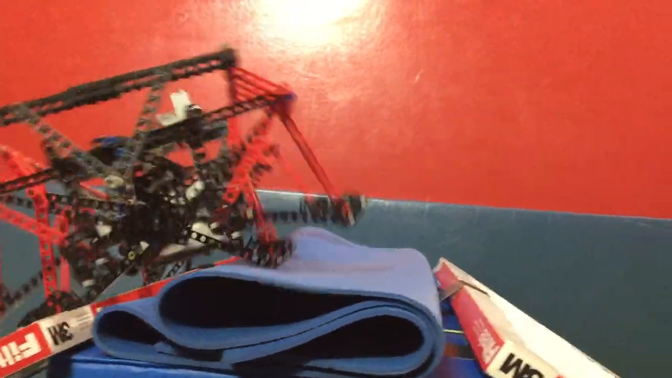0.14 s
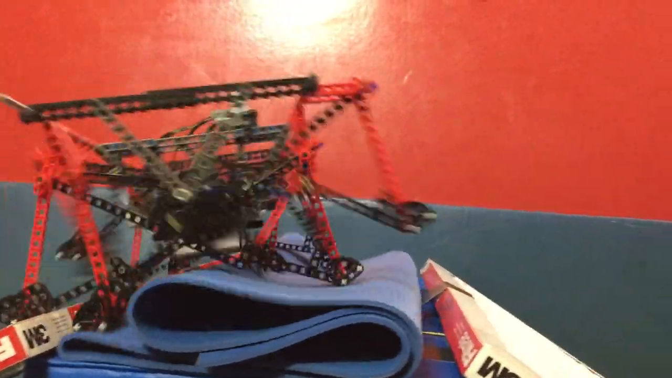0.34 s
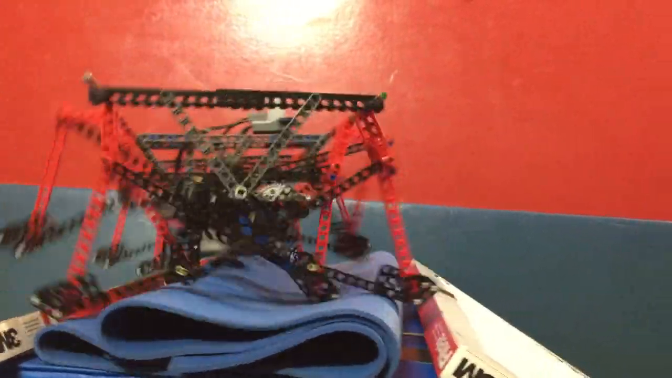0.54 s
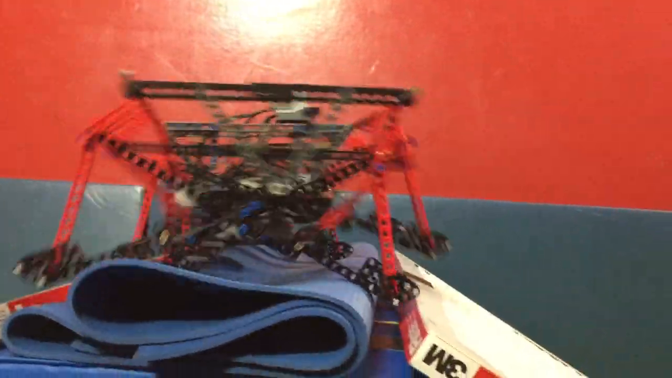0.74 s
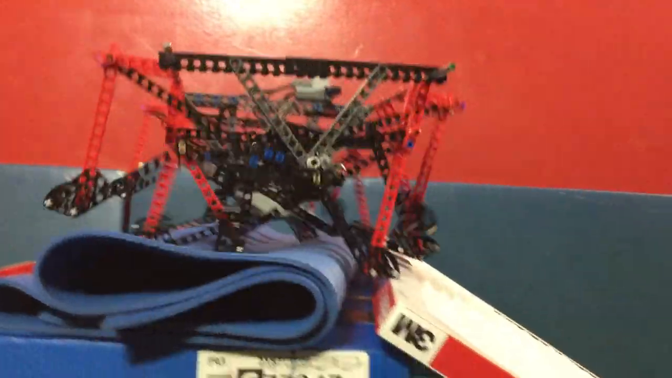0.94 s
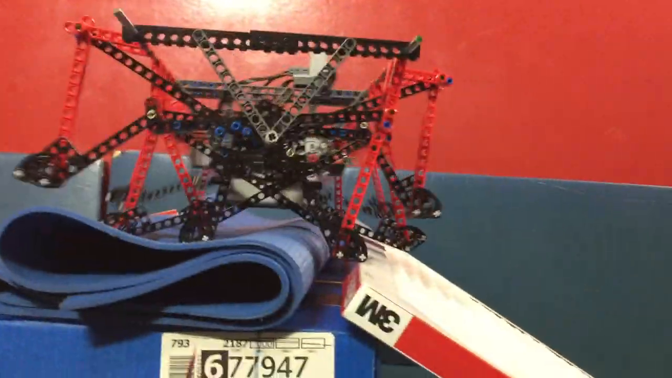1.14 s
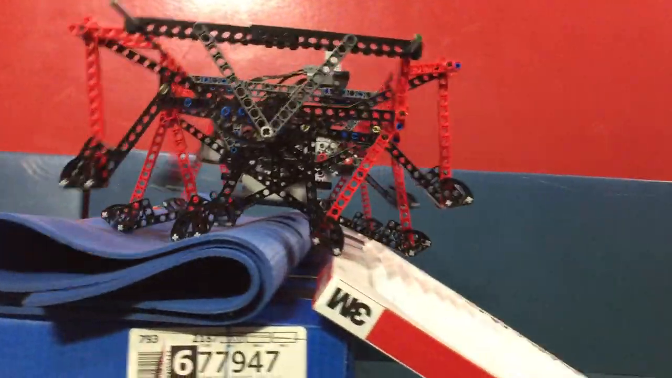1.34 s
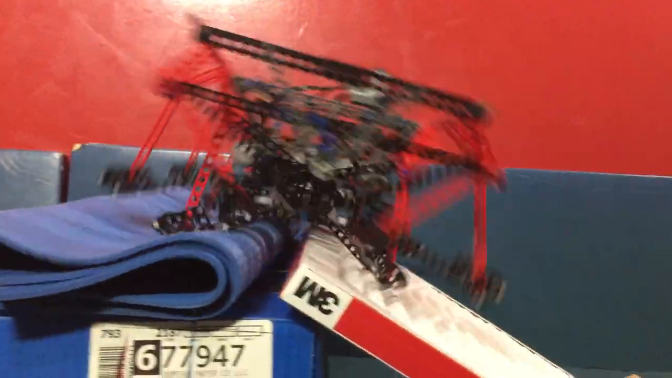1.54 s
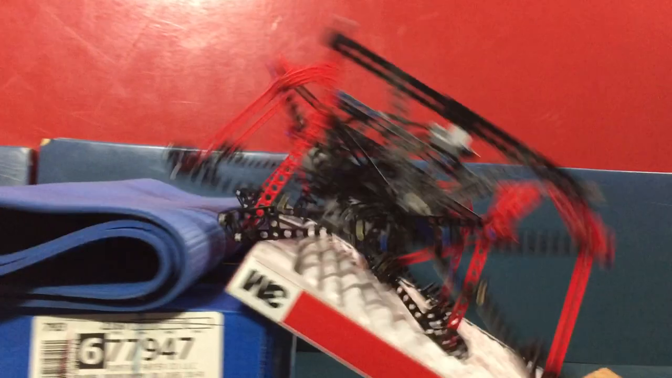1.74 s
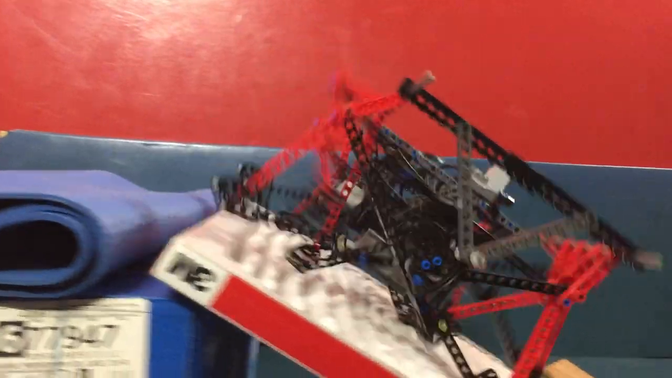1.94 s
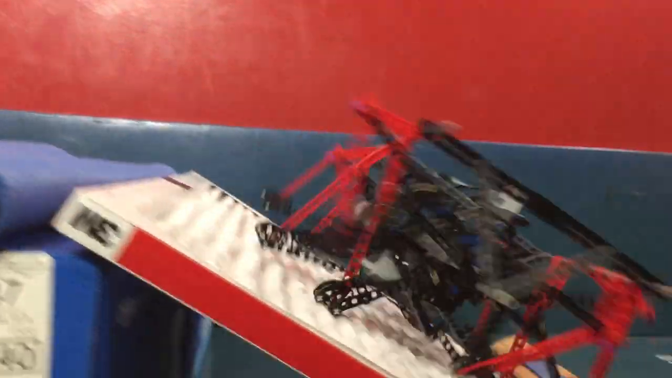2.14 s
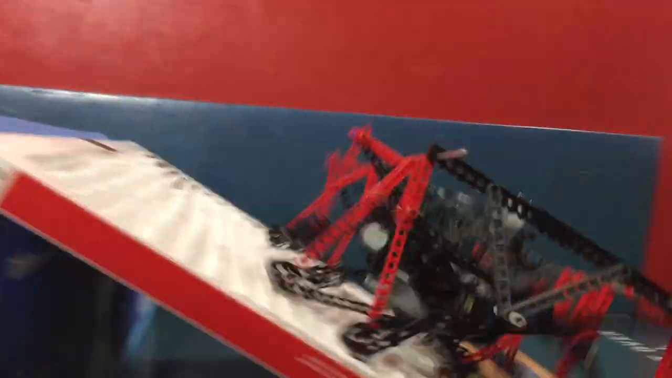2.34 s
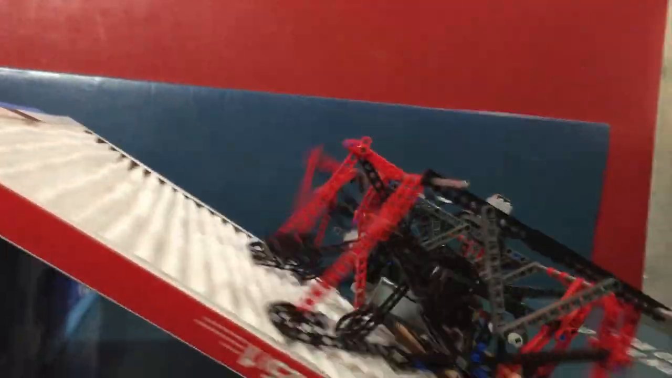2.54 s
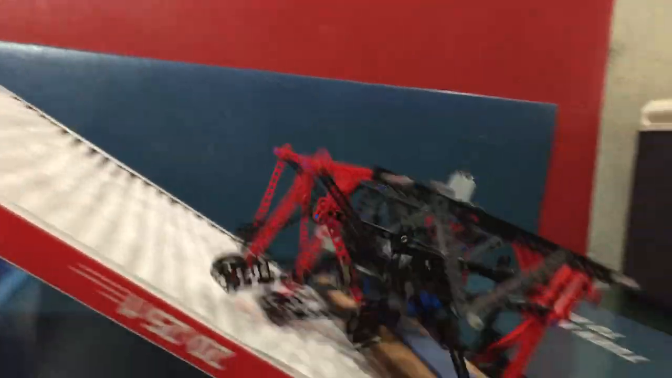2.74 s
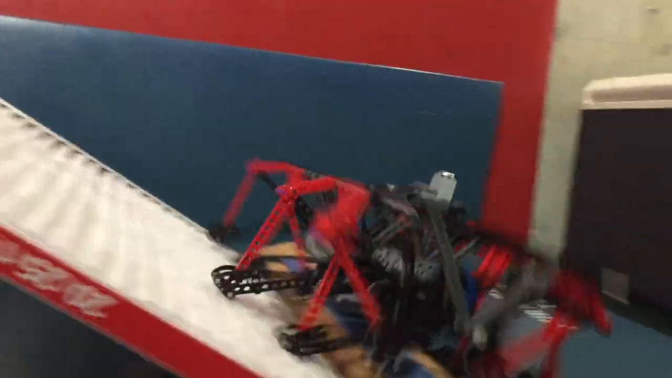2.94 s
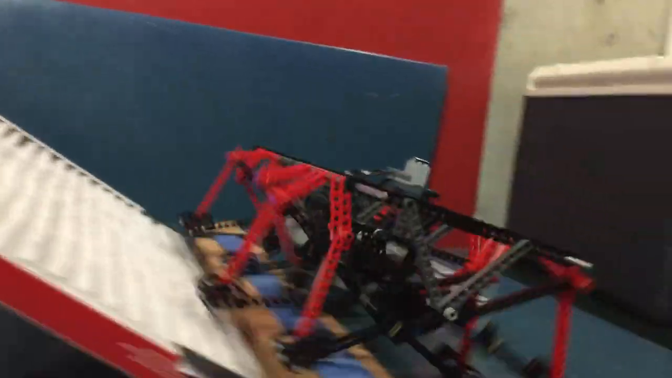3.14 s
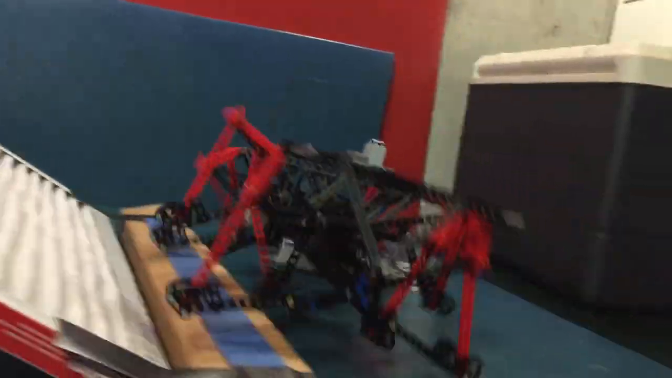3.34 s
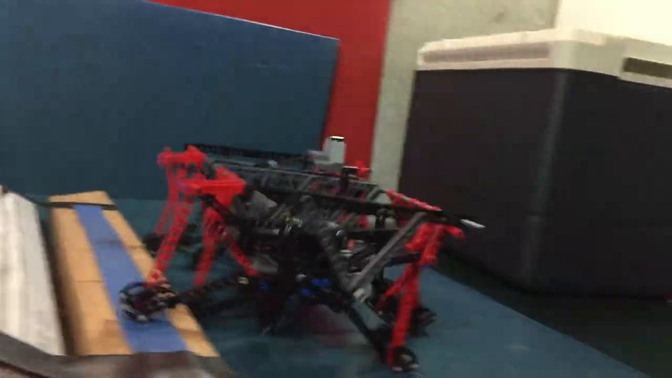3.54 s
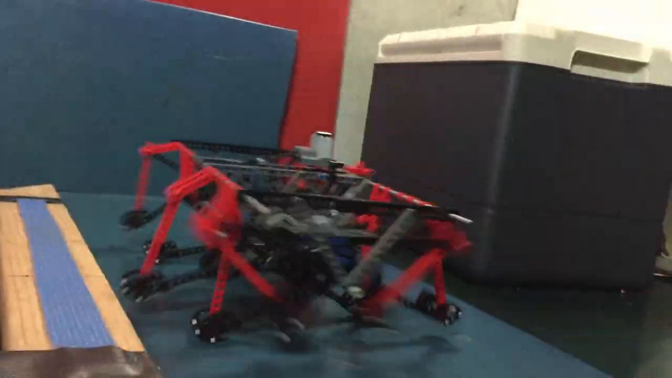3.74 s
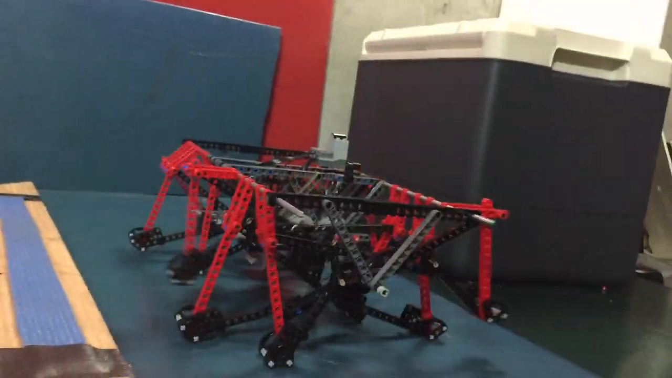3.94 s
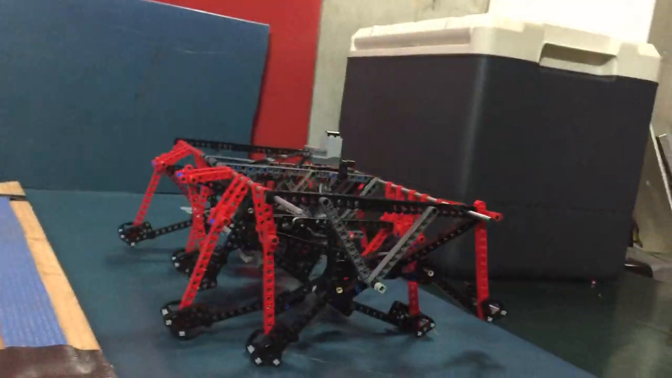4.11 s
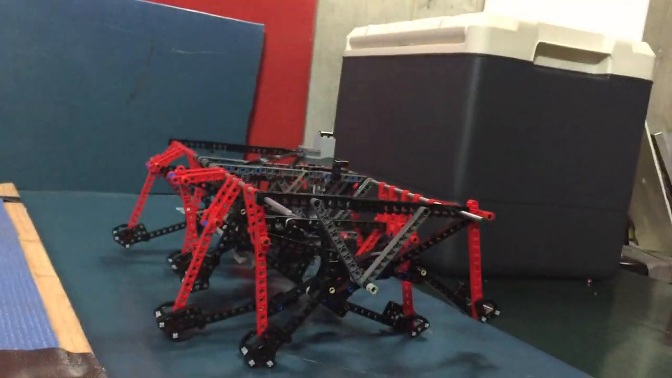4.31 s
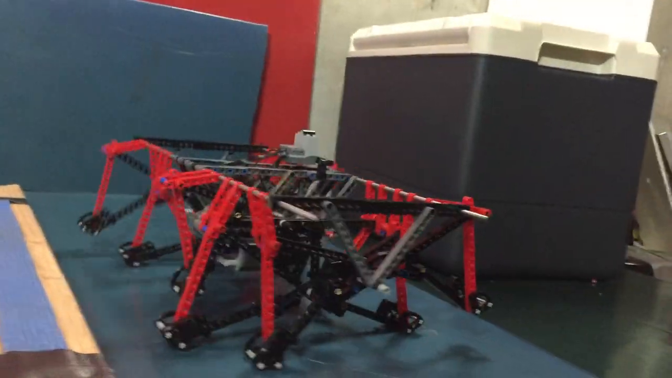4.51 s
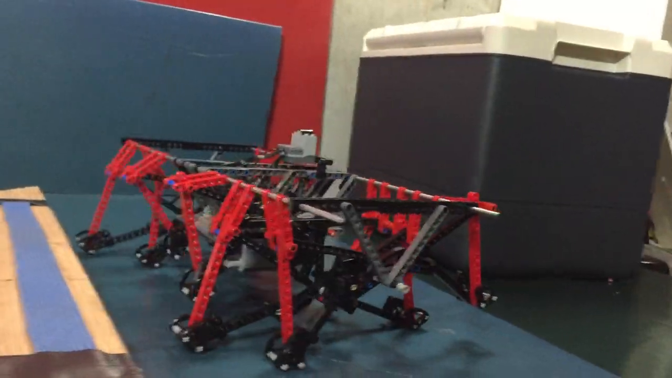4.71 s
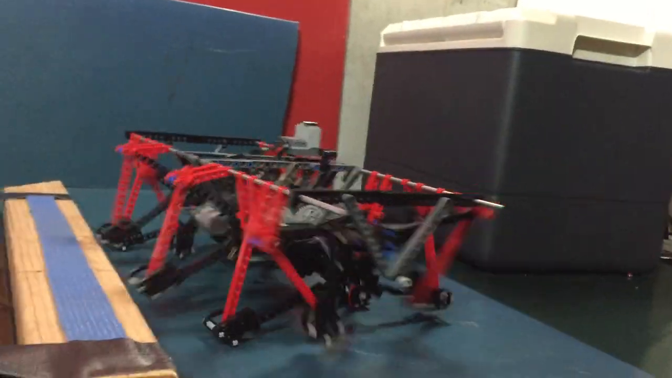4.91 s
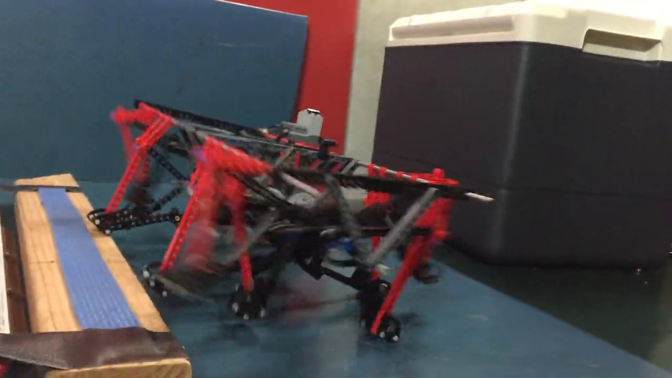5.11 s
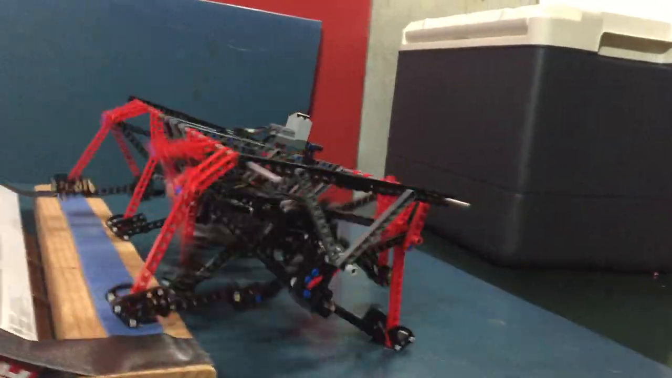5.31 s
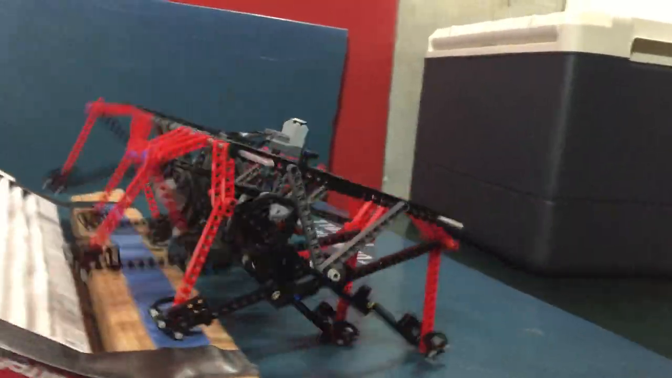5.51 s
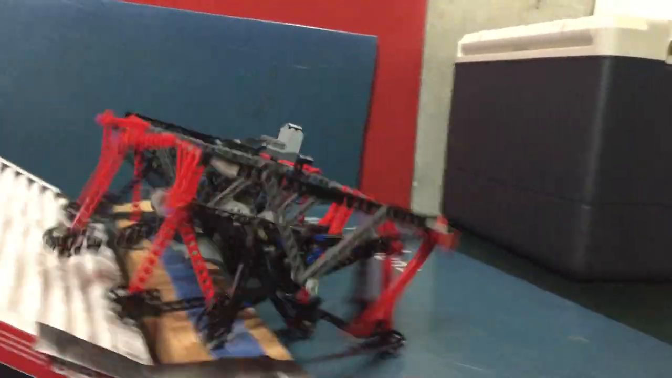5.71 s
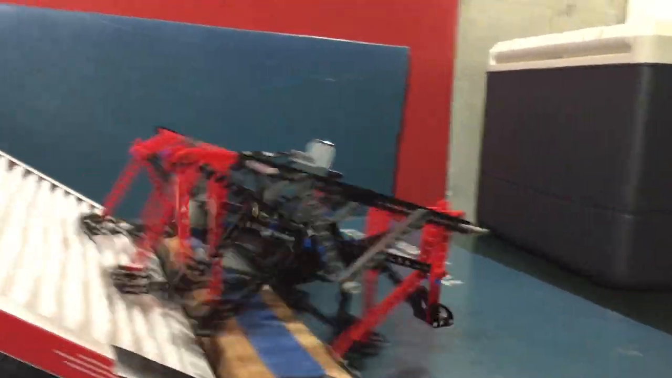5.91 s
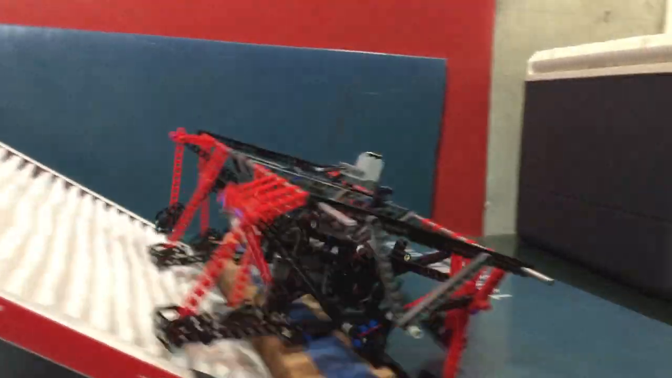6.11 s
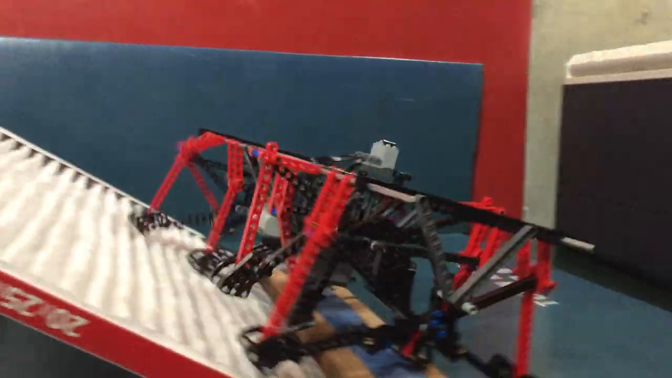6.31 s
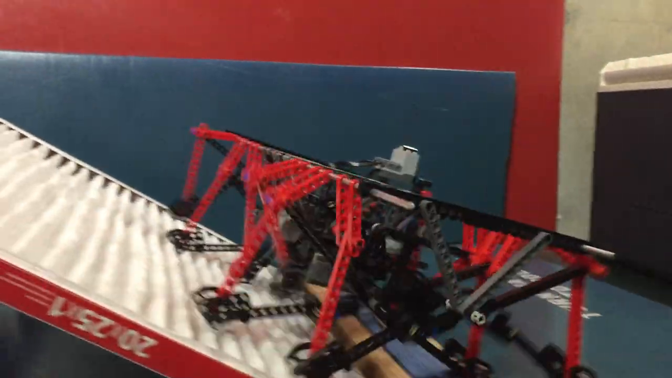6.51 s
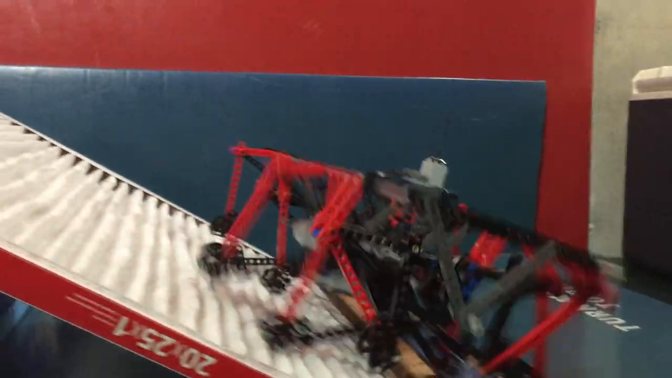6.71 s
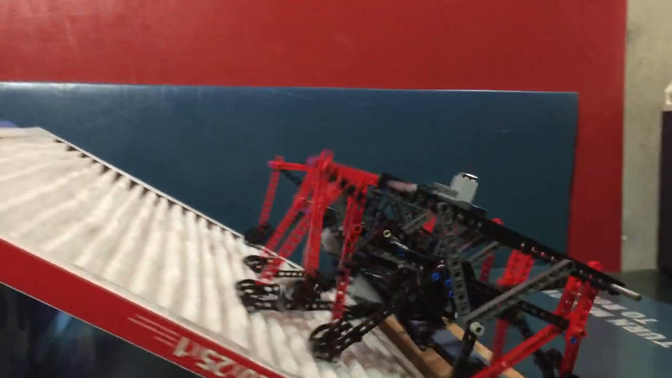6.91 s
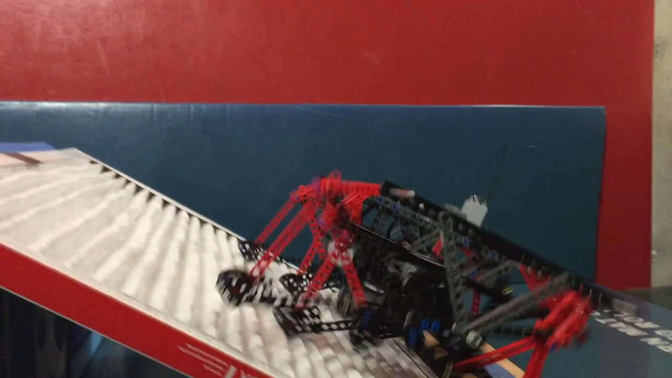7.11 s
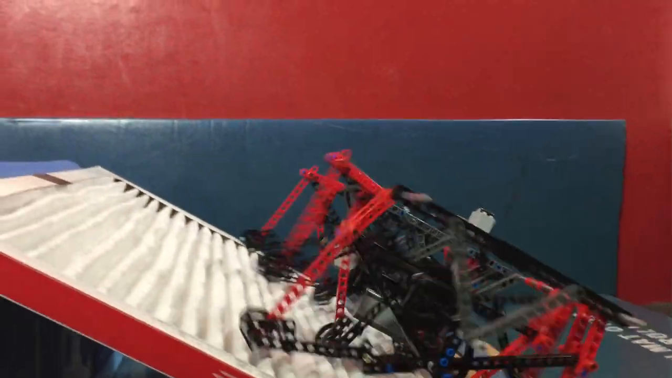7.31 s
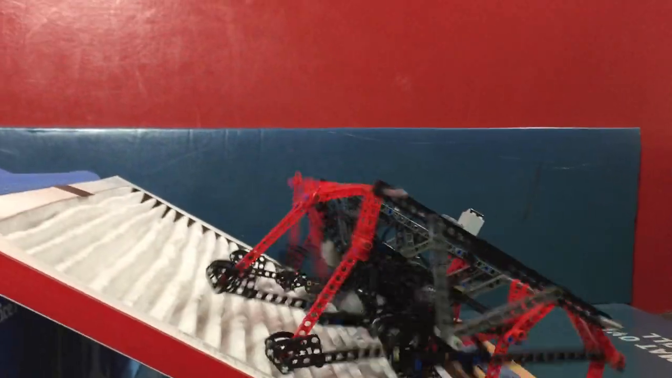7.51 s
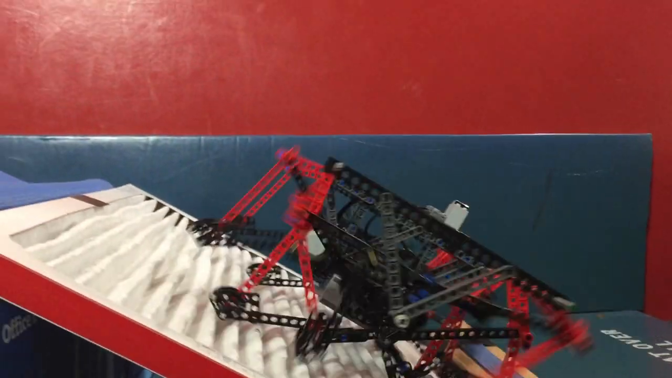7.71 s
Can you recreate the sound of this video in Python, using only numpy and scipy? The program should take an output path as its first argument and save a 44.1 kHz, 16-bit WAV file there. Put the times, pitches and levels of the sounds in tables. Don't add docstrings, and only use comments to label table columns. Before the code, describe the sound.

Close to one microphone in a small room, a plastic walking toy machine runs on hissing, whining motors. Its steps are soft and clicky on a mat, then louder and rattling down a cardboard ramp, then land in hard knocks on the floor. The motors run down, leaving near silence, restart, stop again briefly, then drive on with rough gear chirps and a heavy blow before softer steps on the ramp.

```python
import sys
import numpy as np
from scipy import signal
from scipy.fft import rfft, irfft, next_fast_len
from scipy.io import wavfile
from scipy.ndimage import uniform_filter1d, map_coordinates

SR = 44100
rng = np.random.default_rng(int(sys.argv[2]) if len(sys.argv) > 2 else 0)


def attenuation_scalar(level_db):
    decades = np.asarray(level_db, float) / 20
    return 10 ** decades


def waveform_to_disk(signal):
    frames = np.transpose(np.atleast_2d(signal))
    scaled = np.clip(frames, -1, 1) * 32767
    samples = np.round(scaled).astype(np.int16)
    wavfile.write(sys.argv[1], SR, samples)


N = 341775

# frequency in [Hz], width in [Hz], level in [dB].
FLOOR_MODES = [(398.8, 127.8, -2), (513.7, 78.6, -1), (642.9, 103.8, 0.5), (800, 69.3, 1), (885, 63, 2)]


def unit(x):
    return x / np.sqrt(np.mean(x ** 2) + 1e-20)


def unit_peak(x):
    return x / np.abs(x).max()


def add_at(out, start_s, sound):
    out[round(start_s * SR):][:len(sound)] += sound


def along(points, hz):
    f, v = np.transpose(points)
    return np.interp(np.log(hz + 1), np.log(f + 1), v)


def curves(rows):
    s, *cols = np.transpose(rows)
    return [np.interp(np.arange(N) / SR, s, c) for c in cols]


def wobble(rate_hz):
    knots = rng.standard_normal(int(N * rate_hz / SR) + 4)
    return map_coordinates(knots, [np.arange(N) * rate_hz / SR])


def filtered(x, response):
    m = next_fast_len(len(x) + SR // 10)
    return irfft(rfft(x, m) * response(np.fft.rfftfreq(m, 1 / SR)), m)[:len(x)]


def coloured(spectrum):
    return unit(filtered(rng.standard_normal(N), lambda hz: attenuation_scalar(along(spectrum, hz))))


def ringing(x, modes):
    def response(f):
        total = 0
        for k, (centre, width, db) in enumerate(modes):
            damping = 1j * f * width
            total = total + (-1) ** k * attenuation_scalar(db) * damping / (centre ** 2 - f * f + damping)
        return total
    return filtered(x, response)


def chatter(rate_hz, spread_db):
    hit = rng.random(N) < rate_hz / SR
    return hit * rng.standard_normal(N) * attenuation_scalar(spread_db * rng.exponential(size=N))


def streaky(x, patchy_db):
    z = signal.stft(x, nperseg=512)[2]
    field = uniform_filter1d(rng.standard_normal(z.shape), size=2, axis=0)
    field = uniform_filter1d(field, size=16, axis=1)
    return signal.istft(z * attenuation_scalar(patchy_db * unit(field)), nperseg=512)[1][:N]


def soft(x):
    return signal.sosfilt(signal.butter(2, [230, 960], "bandpass", fs=SR, output="sos"), x)


def swells(s, db, rise_s, fall_s, calm_db):
    column = lambda values: np.reshape(values, (-1, 1))
    t = np.arange(0, N / SR, .002)
    late = t - column(s)
    slope = np.maximum(late / column(fall_s), -late / column(rise_s))
    power = np.sum(attenuation_scalar(column(db) - 20 * slope) ** 2, axis=0)
    return 10 * np.log10(np.interp(np.arange(N) / SR, t, power) + attenuation_scalar(calm_db) ** 2)


def motors():
    # frequency in [Hz], density in [dB].
    housing = [(1650, -36), (2800, -8.5), (2960, -3.5), (3930, 2), (4370, 2), (4670, 0), (5110, 0.5),
               (6710, 3), (7630, -1), (8440, 1.5), (9800, 1), (10600, -3), (13800, -62.5), (22000, -120)]
    sizzle_colour = [(9800, -52), (10300, -6.5), (11500, 9.5), (14000, 7), (15700, 5)]
    rattle_colour = [(700, -20), (1050, -3.5), (1500, -2.5), (2100, 0), (2900, -3.5), (3600, -22)]
    hiss_db, sizzle_db, rattle_db = drive()
    load_db = 0.17 * wobble(17) + 0.91 * wobble(45) + 0.716 * wobble(120)
    teeth = rng.standard_normal(N) + .45 * unit(chatter(3000, spread_db=.7))

    def through(points, patchy_db):
        return unit(filtered(streaky(teeth, patchy_db), lambda hz: attenuation_scalar(along(points, hz))))

    hiss = attenuation_scalar(hiss_db) * (through(housing, patchy_db=2.1) + attenuation_scalar(-12) * squeaks(count=400))
    sizzle = attenuation_scalar(sizzle_db + 1.5 * wobble(40)) * through(sizzle_colour, patchy_db=1.4)
    rattle = attenuation_scalar(rattle_db + 1.6 * wobble(25)) * through(rattle_colour, patchy_db=3.3)
    return attenuation_scalar(load_db) * (hiss + sizzle + rattle)


def drive():
    # time in [s], effort in [dB], brightness as the housing turns
    # to the microphone in [dB], slack in the frame in [dB].
    effort = [(0.0, -55, -13.5, -2.5), (0.15, -54.5, -8.5, -4.5), (0.3, -50.5, -3, -8.5),
              (0.72, -51.5, -11.5, -10), (1.0, -51.5, -7.5, -12.5), (1.22, -52.5, -7, -14),
              (1.5, -52.5, -10, -9.5), (1.77, -53, -1, -10), (2.2, -46.5, 0, -11),
              (3.0, -47.5, -1.5, -10.5), (3.2, -46.5, -2.5, -10.5), (3.48, -48, -3, -9.5),
              (3.8, -47.5, -2.5, -11), (4.5, -51, -7.5, -11.5), (5.2, -46.5, -5, -14),
              (6.3, -45.5, -7, -13.5), (6.37, -51, -10, -13), (7.75, -47, -5.5, -19)]
    # time in [s], hiss in [dB],
    # sizzle re hiss in [dB], rattle re hiss in [dB].
    surges = [(0.21, -58, -4.5, 4), (0.571, -53.5, 1.5, -8.5), (0.87, -54, 2, -15.5),
              (1.39, -56.5, -15.5, -28.5), (1.68, -46.5, -3.5, -20), (1.91, -46.5, -0.5, -4.5),
              (2.05, -48, -6.5, -14.5), (2.36, -46, -9, -7), (2.57, -47.5, -2, -3), (2.751, -46, -4, -13),
              (3.408, -48, -10.5, -10.5), (3.7, -44, -5.5, -4), (4.611, -49, -9.5, -4),
              (4.971, -45, -7, -7), (5.081, -46.5, -3.5, -5.5), (5.42, -53.5, 5, -12.5),
              (6.02, -48.5, -6.5, -1.5), (6.16, -47, -3, -4), (6.56, -48, -3.5, -12.5),
              (6.7, -49.5, -6.5, -34.5), (6.89, -47, -1, -9.5), (7.43, -57, -10, -2)]
    jolts = [
        (0.008, -52.5, 1, -4),
        (2.19, -57.5, -3, 6.5),
        (3.046, -39.5, -4.5, 0.5),
        (3.094, -38, -2, -8),
        (3.618, -34.5, -2, -16),
        (4.32, -76, -18, 4.5),
        (4.743, -54, -7.5, -0.5),
        (5.612, -49, 3, -11.5),
        (5.674, -42, -3.5, -5),
        (7.24, -44.5, -10, -12.5),
    ]
    effort_db, bright_db, slack_db = curves(effort)
    surge_s, surge_db, surge_sizzle, surge_rattle = np.transpose(surges)
    jolt_s, jolt_db, jolt_sizzle, jolt_rattle = np.transpose(jolts)
    lost_db = coasting()

    def level(calm_db, sinks, surge_rel_db, jolt_rel_db):
        running_db = swells(surge_s, surge_db + surge_rel_db, 0.19, 0.183, effort_db + calm_db)
        running_db = running_db - sinks * lost_db
        return swells(jolt_s, jolt_db + jolt_rel_db, 0.0094, 0.115, running_db)

    return (level(0, 1, 0, 0),
            level(bright_db, 1.2, surge_sizzle, jolt_sizzle),
            level(slack_db, 0.823, surge_rattle, jolt_rattle))


def coasting():
    # power off in [s], power on in [s], time to rest in [s].
    stops = [
        (3.944, 4.399, 0.303),
        (4.67, 4.874, 0.193),
    ]
    rest_db, curve, spin_up_s = 33.5, 1.547, 0.0176
    t, lost_db = np.arange(N) / SR, 0
    for off, on, rest_s in stops:
        slowed = np.clip((np.minimum(t, on) - off) / rest_s, 0, 1) ** curve
        lost_db = lost_db + rest_db * slowed * np.exp(-np.maximum(t - on, 0) / spin_up_s)
    return lost_db


def squeaks(count):
    out = np.zeros(N + SR)
    for start, pitch, life, slide, level in rng.random((count, 5)):
        life_s = .04 + .1 * life
        t = np.arange(int(life_s * SR)) / SR
        bend = 1 + .14 * (slide - .55) * t / life_s / 2
        tone = np.sin(2 * np.pi * 3300 * 3 ** pitch * t * bend)
        add_at(out, start * N / SR, attenuation_scalar(7 * level) * np.sin(np.pi * t / life_s) * tone)
    return unit(out[:N] * (1 + 0.78 * wobble(200)))


def whistles():
    # time in [s], mesh pitch in [Hz], level in [dB].
    whine_rows = [(1.87, 4500, -60), (1.9, 4690, -55), (1.945, 4785, -54), (1.985, 4730, -63),
                  (2.01, 4670, -54), (2.05, 4740, -55), (2.07, 4760, -62), (2.145, 4840, -53),
                  (2.17, 4830, -70), (2.24, 4800, -68), (2.27, 4830, -55), (2.325, 4920, -52),
                  (2.365, 5200, -50), (2.4, 5320, -55), (2.43, 5450, -62)]
    # start in [s], end in [s],
    # first pitch in [Hz], last pitch in [Hz], level in [dB].
    early = [(0.027, 0.168, 4560, 4690, -63), (0.705, 0.806, 5860, 5770, -58),
             (0.745, 0.886, 2630, 2500, -66), (0.84, 0.981, 6460, 7130, -60),
             (0.88, 0.981, 3790, 3790, -60), (1.005, 1.106, 4350, 4260, -62),
             (1.055, 1.195, 2020, 2020, -63), (1.104, 1.205, 2990, 3160, -64),
             (1.264, 1.405, 4740, 4480, -60), (1.269, 1.41, 3750, 3080, -59),
             (1.284, 1.425, 2430, 2170, -67), (1.419, 1.52, 4690, 4690, -61),
             (1.529, 1.669, 5680, 5810, -58), (1.643, 1.744, 3420, 3420, -59),
             (1.873, 2.013, 3270, 3140, -58), (2.237, 2.378, 8010, 8140, -56),
             (3.729, 3.829, 5730, 5730, -55), (3.748, 3.889, 2730, 2730, -57),
             (3.928, 4.029, 3920, 3920, -58), (3.963, 4.104, 3470, 3470, -62),
             (4.457, 4.598, 2110, 2650, -59), (4.472, 4.573, 6090, 6010, -58),
             (4.477, 4.548, 5840, 5840, -54), (4.592, 4.662, 3810, 4050, -55),
             (4.911, 4.982, 3210, 3570, -54), (4.931, 5.071, 3550, 3420, -54),
             (5.185, 5.256, 3380, 3680, -54), (5.285, 5.426, 4070, 3810, -54)]
    late = [(5.754, 5.855, 2390, 2390, -56), (5.889, 5.959, 2710, 2540, -56),
            (5.933, 6.034, 8010, 8010, -53), (5.963, 6.064, 8420, 7770, -53),
            (6.178, 6.279, 5080, 4440, -51), (6.223, 6.294, 3420, 3420, -56),
            (6.372, 6.513, 6350, 6480, -59), (6.632, 6.733, 4970, 4240, -50),
            (6.672, 6.813, 3510, 3380, -55), (6.951, 7.052, 8420, 8700, -61),
            (7.001, 7.142, 4200, 4330, -61), (7.006, 7.107, 3440, 3360, -66),
            (7.071, 7.212, 2110, 2240, -70), (7.131, 7.202, 7000, 7240, -55),
            (7.161, 7.301, 2020, 2020, -62), (7.26, 7.401, 1960, 2220, -59), (7.36, 7.501, 2280, 2150, -63),
            (7.37, 7.471, 4440, 4440, -58), (7.49, 7.561, 7100, 7100, -56), (7.56, 7.701, 2130, 2260, -68),
            (7.65, 7.75, 3290, 3570, -58)]
    chirps = [(3.012, 3.047, 4050, 4600, -47), (4.738, 4.775, 1720, 1600, -53),
              (4.745, 4.81, 1440, 1380, -59), (5.08, 5.11, 3950, 3900, -49), (5.13, 5.16, 3900, 3880, -49),
              (5.9, 5.935, 4300, 3880, -49), (5.92, 5.945, 8650, 8400, -50), (5.96, 5.99, 5000, 5300, -48),
              (5.945, 5.985, 6400, 6250, -51), (6.0, 6.04, 5800, 5650, -50), (6.0, 6.035, 7000, 6900, -51),
              (6.01, 6.05, 4500, 4300, -52), (6.065, 6.1, 5900, 5750, -51), (6.12, 6.165, 4850, 4500, -49),
              (6.12, 6.16, 8600, 8300, -50), (6.21, 6.26, 8500, 8050, -51), (6.21, 6.29, 4200, 4050, -52),
              (6.28, 6.32, 5300, 4750, -49), (6.56, 6.62, 4800, 4500, -51), (6.56, 6.62, 3620, 3400, -54),
              (6.77, 6.83, 3450, 3600, -53), (6.77, 6.82, 4550, 4750, -54), (6.46, 6.52, 2150, 2150, -62),
              (7.25, 7.3, 4000, 3850, -52), (7.28, 7.32, 3450, 3250, -54), (7.3, 7.36, 2130, 2130, -55),
              (7.585, 7.62, 4850, 4750, -54), (7.67, 7.75, 4550, 4800, -55)]
    whine_db, glide_db = 2, -4.5
    partner_ratio, partner_db = 1.34, -1
    out = np.zeros(N)
    waver = 1 + .003 * wobble(60) + .003 * wobble(500)
    grit = attenuation_scalar(1.5 * wobble(45)) * (1.35 + .45 * wobble(260))
    whine = [(s, hz, db + whine_db) for s, hz, db in whine_rows]
    partner = [(s, partner_ratio * hz, db + partner_db) for s, hz, db in whine]
    tones = [whine, partner]
    for s0, s1, hz0, hz1, db in early + late + chirps:
        tones.append([(s0, hz0, db + glide_db), (s1, hz1, db + glide_db)])
    for k, rows in enumerate(tones):
        s, hz, db = np.transpose(rows)
        span = np.arange(int(s[0] * SR), min(int(s[-1] * SR), N))
        fade = signal.windows.tukey(len(span), .3)
        own_grit = grit[(span + 9000 * k) % N]
        level = attenuation_scalar(np.interp(span / SR, s, db))
        cycles = np.cumsum(np.interp(span / SR, s, hz) * waver[span]) / SR
        out[span] += fade * own_grit * level * np.sin(2 * np.pi * cycles)
    return out


def footfalls():
    # frequency in [Hz], width in [Hz], level in [dB].
    ramp = [(145, 23, -20.5), (217.5, 40.8, 15), (305.4, 82, -4)]
    out, t = np.zeros(N + SR), np.arange(SR // 4) / SR
    for s, db, thud_db, hz in steps():
        shake_db = -60 * t / 0.173 - 0.43 * max(db + 37.5, 0)
        shake = rng.standard_normal((2, len(t))) * 0.0483 * attenuation_scalar(shake_db)
        knots = t[::350]
        shake *= attenuation_scalar(3.5 * np.interp(t, knots, rng.standard_normal(len(knots))))
        shake[:, 0] = 2.2
        spot = [(c, w, level - 9 * abs(np.log2(c / hz))) for c, w, level in FLOOR_MODES]
        knock = unit_peak(soft(ringing(shake[0], spot)))
        thud = unit_peak(ringing(shake[1], ramp))
        add_at(out, s, attenuation_scalar(db) * (knock + attenuation_scalar(thud_db - 1.0) * thud))
    return out[:N]


def steps():
    # time in [s], knock peak in [dB], thud re knock in [dB], knock pitch in [Hz].
    soft_steps = [(0.064, -39.5, -28.5, 600), (0.16, -46, -10.5, 439), (0.215, -43, -14.5, 651),
                  (0.375, -53, -32, 640), (0.46, -57.5, -29.5, 640), (0.541, -56, 1, 339),
                  (0.6, -52.5, -25.5, 640), (1.014, -52, -18, 500), (1.735, -53.5, -1, 778),
                  (1.83, -46.5, -5, 614), (2.032, -52, -0.5, 800), (2.185, -51.5, -4.5, 750),
                  (2.269, -44, 7.5, 926), (2.382, -47.5, -12.5, 869), (2.51, -40.5, -13.5, 584),
                  (2.573, -45.5, -30, 750), (2.673, -55.5, 3, 320), (2.718, -35.5, -12, 880),
                  (2.793, -38.5, -1.5, 833), (6.46, -52.5, 3, 349), (6.611, -49, -6, 430),
                  (6.83, -45.5, -11, 662), (6.861, -44, -5.5, 620), (7.239, -42.5, -30.5, 830)]
    # time in [s], knock peak in [dB], knock pitch in [Hz].
    hard_steps = [(3.042, -31.5, 374), (3.094, -22, 622), (3.192, -35.5, 719), (3.268, -31, 517),
                  (3.313, -33.5, 578), (3.382, -37.5, 810), (3.511, -35, 840), (3.531, -36.5, 597),
                  (3.621, -23.5, 600), (3.693, -33, 790), (3.722, -31.5, 800), (3.869, -39, 577),
                  (3.998, -36.5, 654), (4.56, -41, 637), (4.61, -38.5, 614), (4.938, -35.5, 626),
                  (4.976, -33, 618), (5.059, -35.5, 595), (5.273, -37.5, 753), (5.4, -38.5, 627),
                  (5.609, -30.5, 572), (5.676, -30.5, 560), (5.87, -41, 668), (6.026, -33.5, 790),
                  (6.118, -32.5, 705), (6.159, -34, 650), (6.287, -48.5, 820)]
    return soft_steps + [(s, db, -25.5 + 0.787 * (db + 39), hz) for s, db, hz in hard_steps]


def rebounds():
    # time in [s], peak in [dB], pitch in [Hz].
    taps = [(3.0926, -16, 480), (3.6205, -17.5, 450), (5.6755, -25.5, 469), (3.3005, -34.5, 617),
            (3.3696, -39, 400), (3.437, -46, 652), (5.043, -41.5, 500), (5.422, -39, 695),
            (4.991, -41, 750), (3.0495, -33.5, 500), (3.056, -33.5, 450), (3.1005, -26.5, 800),
            (3.1078, -22.5, 613), (3.115, -35, 560), (3.1265, -32.5, 643), (3.138, -37, 700),
            (3.147, -34, 800), (3.1555, -37.5, 617), (3.2735, -38.5, 596), (3.6245, -26, 512),
            (3.636, -35, 560), (3.652, -31.5, 800), (3.664, -31.5, 624), (3.741, -34.5, 695),
            (5.6272, -39, 620), (5.691, -40.5, 520), (5.738, -39, 602), (2.753, -43, 860),
            (4.575, -42, 800)]
    out, impulse = np.zeros(N + SR), np.eye(1, SR // 20)[0]
    for s, db, hz in taps:
        width_hz = 210
        add_at(out, s, attenuation_scalar(db) * unit_peak(soft(ringing(impulse, [(hz, width_hz, 0)]))))
    return out[:N]


def clicks():
    # time in [s], peak in [dB], pitch in [Hz], crack re peak in [dB].
    linkages = [(0.0467, -41.5, 1330, -12), (0.9039, -34, 1600, -25.5), (0.921, -34, 2130, -19.5),
                (0.934, -39.5, 2160, -20), (1.4686, -30.5, 2470, -24.5), (1.551, -38.5, 2000, -8.5),
                (1.599, -45, 1900, -14.5), (1.953, -39, 2000, -15.5), (1.8175, -33.5, 1450, -6),
                (2.2112, -32, 1910, -7.5), (2.2709, -26, 1033, -18.5), (2.3829, -31, 1430, -5.5),
                (2.4905, -27.5, 1212, -18), (2.506, -29.5, 1160, -1), (2.522, -34.5, 1190, -22),
                (2.7171, -26, 2590, -13.5), (3.092, -19, 2277, -6.5), (3.6197, -19, 1901, -18),
                (3.6248, -27.5, 1490, -15), (3.6923, -24.5, 2380, -7), (4.3109, -61, 1050, -23),
                (4.3127, -66, 3560, -25.5), (4.7414, -49.5, 1575, -16.5), (5.0452, -34, 2320, -11.5),
                (5.6753, -21.5, 1227, -20), (6.648, -41.5, 2380, -21), (5.8263, -33, 2470, -19),
                (7.237, -33, 4370, -13), (7.2394, -35, 2000, -12.5), (7.243, -42, 3320, -14),
                (7.479, -30, 2126, -20)]
    # time in [s], peak in [dB].
    ankles = [(0.163, -39), (0.199, -34), (0.5381, -42), (2.0348, -33), (2.5715, -31), (2.794, -30),
              (3.04, -26), (3.1943, -33), (3.2728, -30), (3.381, -35), (3.5115, -37.5), (4.9369, -36.5),
              (5.275, -40), (5.4011, -37), (5.612, -35), (6.119, -30.5), (6.1621, -33), (6.879, -39)]
    # frequency in [Hz], width in [Hz], level in [dB].
    frame = [(1450, 830, 5), (2000, 297, 8), (2470, 586, 1), (3554, 610, -3)]
    ankle_hz, ankle_crack_db = 2660, -4
    out, t = np.zeros(N + SR), np.arange(SR // 6) / SR
    bright = signal.butter(2, 3500, "highpass", fs=SR, output="sos")
    slap = attenuation_scalar(-60 * t / .012) * (1 - np.exp(-t / .0003))
    shiver = attenuation_scalar(-60 * t / 0.232) * (1 - np.exp(-t / 0.00334))
    pins = [(s, db, ankle_hz * 2 ** rng.uniform(-.7, 0.76), ankle_crack_db) for s, db in ankles]
    for s, db, hz, crack_db in linkages + pins:
        jolt = rng.standard_normal((2, len(t)))
        ring = slap * np.sin(2 * np.pi * hz * t)
        clack = 1.9 * ringing(jolt[0] * (slap + .09 * shiver), frame)
        snap = jolt[1] * (attenuation_scalar(-60 * t / .022) + .06 * shiver)
        crack = attenuation_scalar(crack_db + 3.5) * signal.sosfilt(bright, snap)
        add_at(out, s + .0006, attenuation_scalar(db - 3.5) * (ring + clack + crack))
    return out[:N]


def ticks():
    # time in [s], peak in [dB].
    snaps = [
        (1.0155, -26),
        (1.505, -38.5),
        (1.6241, -29),
        (1.7071, -33.5),
        (3.1926, -24),
        (3.4128, -33.5),
        (5.612, -28.5),
        (6.9007, -33),
    ]
    t60_s = 0.00666
    out, t = np.zeros(N + SR), np.arange(SR // 50) / SR
    for s, db in snaps:
        add_at(out, s, attenuation_scalar(db - 7 - 60 * t / t60_s) * np.diff(rng.standard_normal(len(t) + 1)))
    return out[:N]


def scuffle():
    # frequency in [Hz], density in [dB].
    flex_colour = [(68, -47.5), (115, -2.5), (173, -4.5), (248, -2), (330, -2.5), (430, -44.5), (730, -120)]
    boom_colour = [(18, -52), (30, -14), (70, 3.5), (115, -11.5), (150, -41.5), (250, -120)]
    scuff_db, flex_db, boom_db = ground()
    contacts = 1.56 * rng.standard_normal(N) + unit(chatter(120, spread_db=-6.0))
    drag = attenuation_scalar(scuff_db) * unit(soft(ringing(contacts, FLOOR_MODES)))
    flex = attenuation_scalar(flex_db - 1.0 + 3.2 * wobble(18)) * coloured(flex_colour)
    boom = attenuation_scalar(boom_db + 1.5) * coloured(boom_colour)
    return drag + flex + boom


def ground():
    # time in [s], time to sink 20 dB in [s],
    # flex in [dB], boom re flex in [dB].
    lurches = [(0.02, 0.1, -52.5, -7.5), (0.11, 0.4, -58.5, -2), (0.2, 0.1342, -55.5, -9.5),
               (0.24, 0.0745, -51, -6.5), (0.285, 0.0721, -54.5, -12.5), (0.55, 0.16, -59.5, -5),
               (1.75, 0.76, -64.5, -5), (1.85, 0.0444, -57, 4), (2.2, 0.274, -54.5, 1),
               (2.285, 0.0147, -47, -4), (2.42, 0.29, -55.5, -3), (2.74, 0.0619, -46.5, -7.5),
               (2.81, 0.02, -59, -10), (3.1, 0.12, -51, 2), (3.32, 0.39, -64, -12.5),
               (3.63, 0.0423, -44, -15), (3.71, 0.1, -59, -6), (4.62, 0.06, -70, -3), (5.07, 0.15, -63, 0),
               (5.29, .06, -68, -14.5), (5.43, 0.16, -64, -13.5), (5.68, 0.1263, -51, -16),
               (5.97, 0.05, -60, -18), (6.05, 0.05, -58.5, -15.5), (6.15, -0.2636, -53, -16),
               (6.48, -0.01, -60.5, 6), (6.87, .08, -56, -18), (7.3, 0.86, -68.5, -1.5),
               (7.48, 0.06, -62, -12), (7.57, 0.04, -62, -13)]
    step_s, step_db = np.transpose(steps())[:2]
    lurch_s, sink_s, flex_db, boom_db = np.transpose(lurches)
    fall_s = abs(sink_s)
    rise_s = 0.236 * fall_s
    still_db = 0.236 * coasting()
    drag_db = -64.5 + 0.643 * (step_db + 38.5)
    return (swells(step_s, drag_db, 0.071, 0.189, -74 - still_db),
            swells(lurch_s, flex_db, rise_s, fall_s, -79 - still_db),
            swells(lurch_s, flex_db + boom_db, rise_s, fall_s, -80 - still_db))


def room(x):
    # frequency in [Hz], t60 in [s].
    decay = [(200, 0.15), (2000, 0.232), (10000, 0.0296)]
    hz, t, z = signal.stft(rng.standard_normal(SR // 2), SR, nperseg=256)
    tail = signal.istft(z * attenuation_scalar(-60 * t / along(decay, hz)[:, None]), SR, nperseg=256)[1]
    return signal.fftconvolve(np.pad(x, (180, 0)), tail / np.linalg.norm(tail))[:N]


def air():
    # frequency in [Hz], density in [dB].
    hum = [(18, -49.5), (30, 1.5), (145, -8), (210, -7.5), (259, -29), (889, -14), (3060, -13),
           (16000, -35.5)]
    return attenuation_scalar(-75) * coloured(hum)


def scene():
    hits = footfalls() + rebounds() + clicks() + ticks()
    mono = motors() + whistles() + scuffle() + hits + attenuation_scalar(-9.0) * room(hits) + air()
    return np.array([mono, mono])


def roll_off(x):
    return signal.sosfilt(signal.butter(12, 16780, fs=SR, output="sos"), x)


def record(dry):
    def microphone(hz):
        port = attenuation_scalar(-6 * np.exp(-((hz - 10450) / 220) ** 2))
        bass_cut = (1j * hz / (45 + 1j * hz)) ** 2
        return (hz < 15830) * port * bass_cut

    mono = filtered(dry[0], microphone)
    return roll_off(np.array([mono, mono]))


dry = scene()
out = record(dry)
waveform_to_disk(out)
```